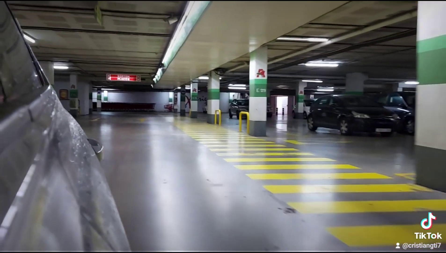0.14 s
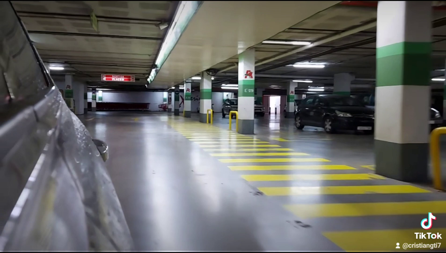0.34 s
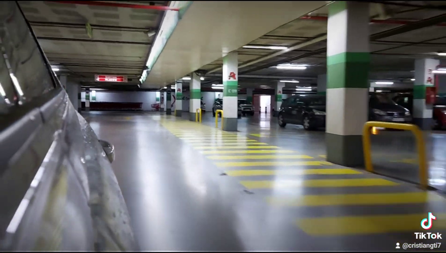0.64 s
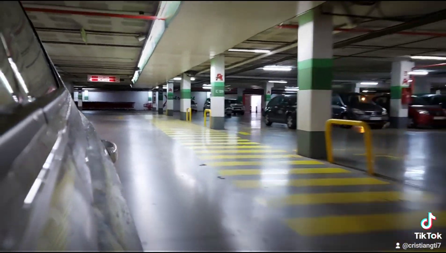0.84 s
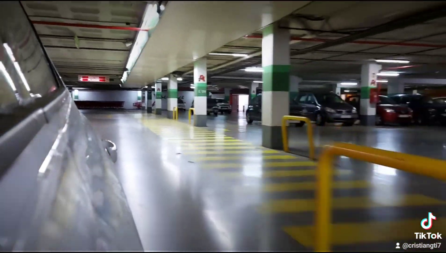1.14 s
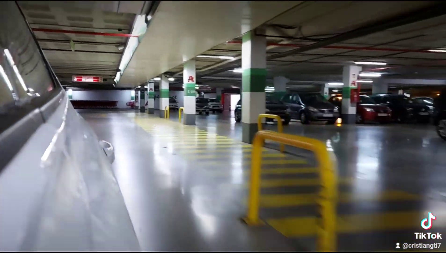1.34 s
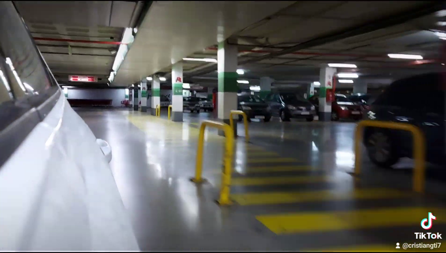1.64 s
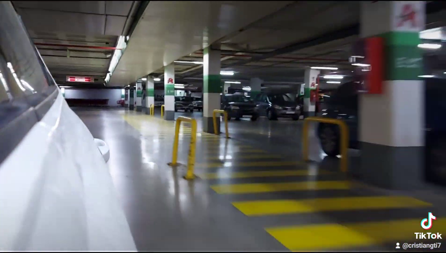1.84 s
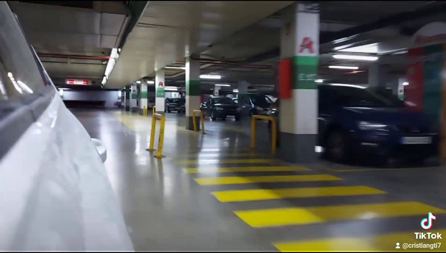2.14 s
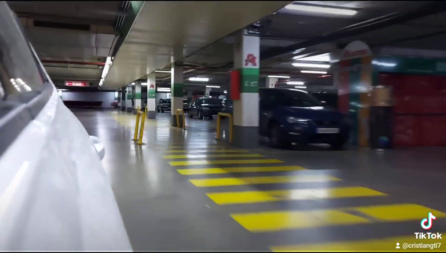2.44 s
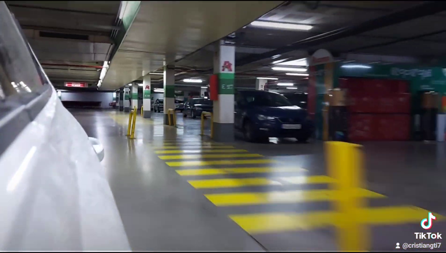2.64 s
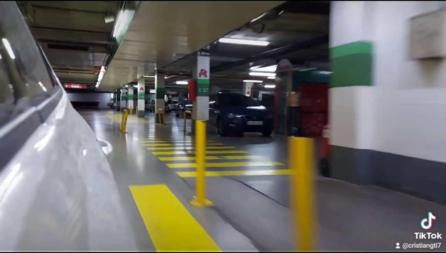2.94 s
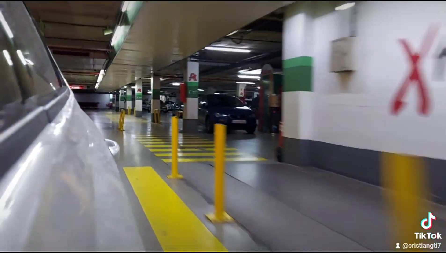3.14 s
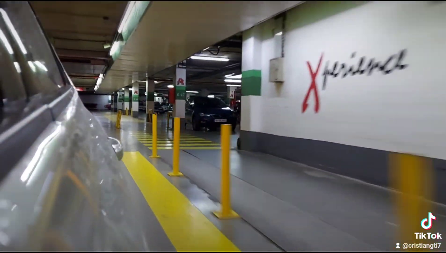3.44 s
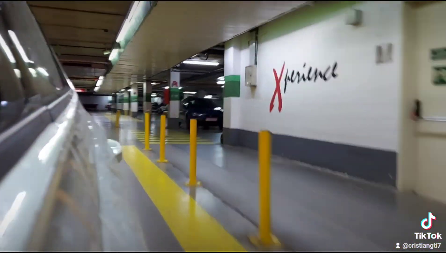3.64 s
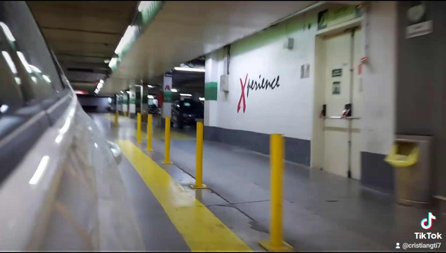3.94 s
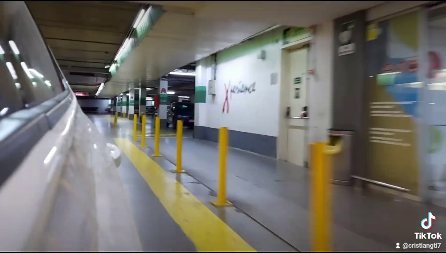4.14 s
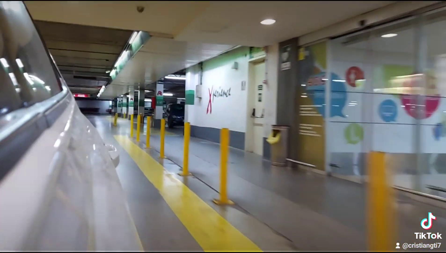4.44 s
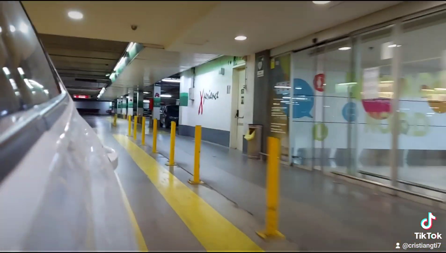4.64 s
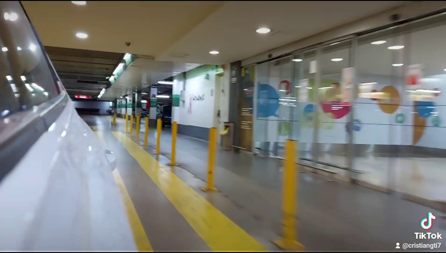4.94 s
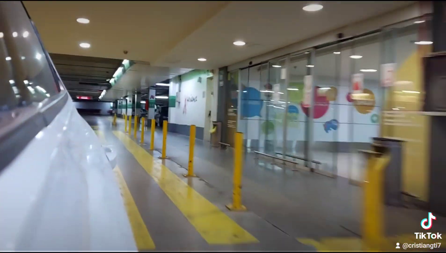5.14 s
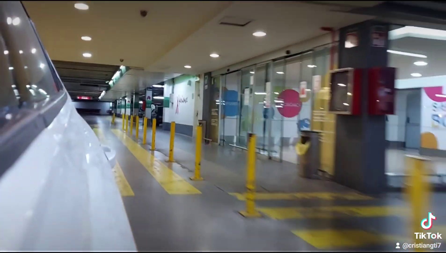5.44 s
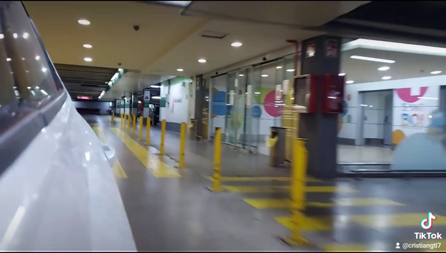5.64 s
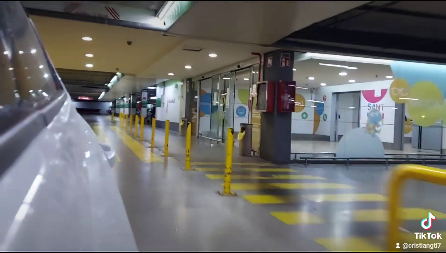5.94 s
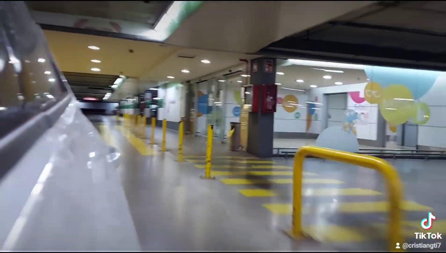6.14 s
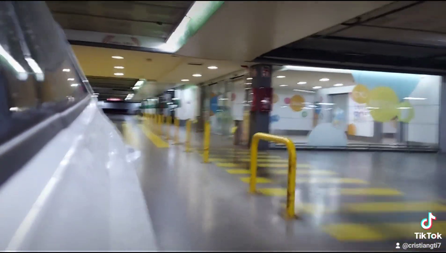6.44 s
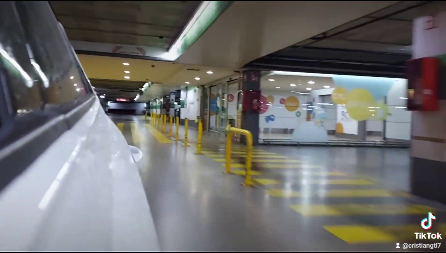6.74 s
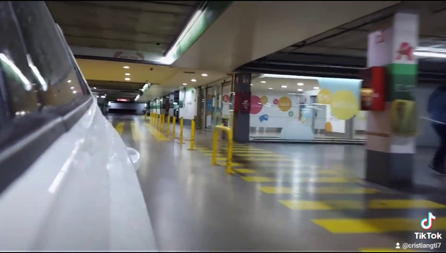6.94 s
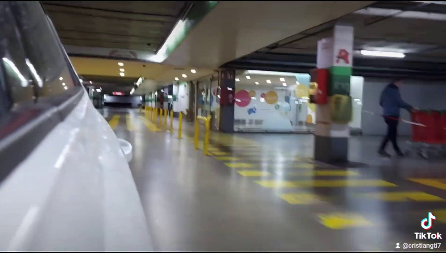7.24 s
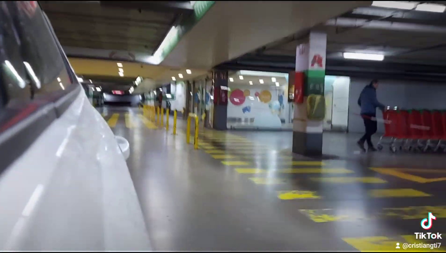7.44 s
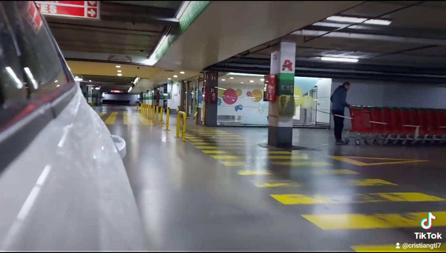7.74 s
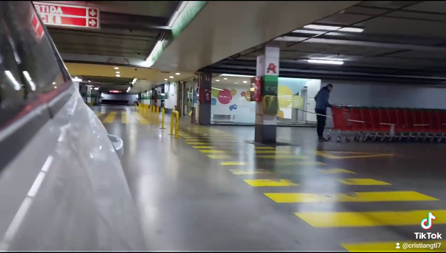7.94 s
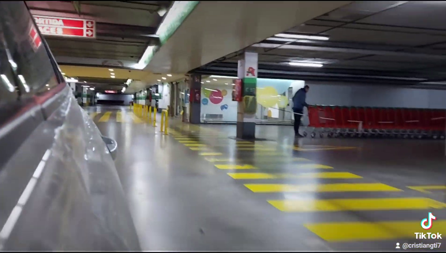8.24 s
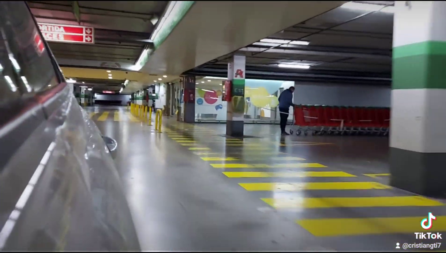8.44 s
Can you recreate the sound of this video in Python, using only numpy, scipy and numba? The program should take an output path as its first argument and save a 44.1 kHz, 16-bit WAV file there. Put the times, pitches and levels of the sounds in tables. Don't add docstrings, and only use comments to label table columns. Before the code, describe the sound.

Raspy car exhaust climbs, lifts off with a bark and sharp turbo hiss, burbles and pops, then blips again to one loud bang among concrete walls.

```python
import sys
import numpy as np
from scipy import signal
from scipy.fft import rfft, irfft
from scipy.io import wavfile
from scipy.ndimage import uniform_filter1d
from numba import njit

SR = 44100
rng = np.random.default_rng(int(sys.argv[2]) if len(sys.argv) > 2 else 0)


def magnitude_from_level(level_db):
    exponent = np.asarray(level_db, float) / 20
    return 10 ** exponent


def output_pcm(signal):
    pcm = np.clip(np.atleast_2d(signal).T, -1, 1) * 32767
    wavfile.write(sys.argv[1], SR, np.round(pcm).astype(np.int16))


N = 378378
T = np.arange(N) / SR

# time in seconds, firing rate in Hz.
FIRING_RATE = [(0.0, 41.82), (0.45, 48.97), (0.77, 56.5), (1.19, 64.67), (1.44, 74.68), (1.59, 78.07),
               (1.72, 86.2), (1.86, 98.14), (2.0, 117.8), (2.05, 114.9), (2.18, 95.45), (2.5, 81.77),
               (3.03, 63.6), (4.23, 57.88), (5.14, 52.75), (5.4, 68.49), (5.56, 72.97), (5.66, 82),
               (5.84, 81.36), (6.2, 82.38), (6.52, 84), (6.64, 78.13), (6.9, 74.5), (7.6, 65.53),
               (8.58, 59.12)]
# time in seconds, exhaust note in dB, load from 0 to 1.
THROTTLE = [(0.0, -19.5, 0), (0.55, -19.5, 0), (1.05, -16, 0.4), (1.4, -16, 0.8), (2.05, -13, 0.75),
            (2.22, -20.5, 0.81), (2.4, -36.5, 0.56), (2.84, -44, 0.75), (3.6, -33.5, 0.5), (4.3, -22, 0.19),
            (4.9, -20.5, 0.17), (5.15, -25.5, 0.25), (5.7, -19, 0.42), (5.8, -24, 0.63), (6.55, -16.5, 0.7),
            (7.2, -19.5, 0.42), (7.75, -21, 0.42), (8.58, -25.5, 0.1)]
# time in seconds, misfire scatter in dB,
# lope as the share of a period by which every second firing comes late.
BURN = [(0, .9, .014), (2.05, 1.1, .014), (2.3, 6, .03), (3.0, 6, .025), (4, 4.5, .02), (5, 4, .02),
        (5.36, 3.5, .02), (5.4, 1.8, .015), (5.57, 1.8, .015), (5.62, 4.5, .1), (5.72, 4, .1),
        (5.8, 4.5, .04), (6.12, 5, .045), (6.25, 6, .08), (6.66, 6, .08), (6.71, 2.5, .04),
        (6.88, 2.2, .015), (8, 2.5, .015), (8.1, 4, .015), (8.3, 1.5, .015), (8.58, 1.5, .015)]
CYLINDER_DB = [0.25, -0.24, -0.5, 0.37]
# middle in seconds, length in seconds, level in dB.
NOTE_DIPS = [(5.1, .05, -5), (2.8, .12, -5), (2.054, 0.08, -8), (5.17, .08, -8), (5.362, .06, -4),
             (2.858, 0.103, -7), (4.278, 0.13, -4.5), (5.023, 0.086, -7), (5.623, 0.066, -9),
             (6.305, 0.079, -3), (6.69, 0.049, -6), (7.014, 0.15, -5.5), (7.673, 0.13, -11.5),
             (8.223, 0.097, -18.5)]
# frequency in Hz, width in Hz.
PIPE_MODES = [(88, 45), (135, 58), (178, 40.7), (236, 32), (275, 64.5), (362, 65.4)]
MODE_DB = [-21.5, -18.5, -4.5, -20, -6, -5.5]
MODE_LOAD_DB = [16.5, 1.5, -5, 3, -2.5, -3.5]
# frequency in Hz, width in Hz, level in dB.
OVERTONES = [(449, 60, -11.5), (556.5, 52, -11), (680, 51, -17), (894.3, 80, -25)]
# frequency in Hz, width in Hz.
NOTCH = (204, 46)
# middle in seconds, length in seconds, mode in Hz, level in dB.
BAYS = [(0.08, 0.32, 178, 8), (0.63, 0.54, 178, 5.5), (0.039, 0.19, 275, 9.5), (0.94, .35, 135, -16),
        (1.689, 0.13, 88, 3.5), (2.13, 0.17, 88, 4.5), (0.43, 1, 236, -20), (0.33, 0.46, 135, 9),
        (1.563, 0.176, 178, 3.5), (6.86, 0.18, 88, 6), (6.45, 0.61, 362, 2), (7.4, 0.43, 275, -0.5),
        (5.77, 0.16, 88, 6.5), (6.22, 0.157, 88, -6), (6.27, 0.15, 178, -7), (6.42, 0.11, 178, 3),
        (6.19, 0.2, 236, 13), (7.1, 0.21, 236, 2), (6.85, 0.17, 135, 4), (6.92, 0.073, 275, 4),
        (6.5, 0.1154, 178, -1), (4.15, 0.29, 178, 4), (4.33, 0.13, 178, -5), (5.2, 0.1095, 178, -15),
        (4.876, 0.56, 178, 5.5), (4.6, 0.051, 362, 5), (5.2, 0.055, 362, 1), (1.025, 0.33, 178, 5),
        (1.209, 0.39, 275, 7), (1.335, 0.2, 135, 13.5), (1.47, 0.248, 362, 12), (1.475, 0.26, 275, -27),
        (1.75, 0.19, 362, -33), (1.97, 0.7, 178, 5.5), (1.982, 0.32, 236, 8), (0.43, 0.28, 362, 5),
        (6.4, 0.11, 88, 3), (4.874, 0.72, 178, -5), (4.86, 0.96, 275, -4.5), (4.77, 0.63, 362, -5.5),
        (6, 0.23, 362, 10), (5.71, 0.091, 362, 3), (5.97, 0.34, 362, -9.5), (5.1, 0.23, 236, 3.5),
        (5.9, 0.34, 275, -1.5), (8.0, 0.46, 236, 13), (8.1, 0.075, 88, 13.5), (8.504, 0.26, 178, 5),
        (7.83, 0.69, 178, -6), (5.9, 0.35, 88, 5)]
# middle in seconds, length in seconds, pitch in Hz, level in dB.
HOWLS = [(1.338, 0.15, 569, -26), (1.458, .1, 376.2, -14.5), (1.55, 0.067, 386, -17.5),
         (1.68, .14, 600, -26), (1.88, .3, 896, -32), (2.074, 0.09, 898, -25), (2.07, .08, 581, -24),
         (4.192, 0.056, 350.2, -21), (4.44, .12, 335, -25.5), (4.623, 0.059, 321, -22),
         (4.737, 0.059, 324, -21.5), (4.87, .14, 324, -25), (5.43, 0.081, 345, -19),
         (5.532, 0.093, 363, -17.5), (5.69, 0.082, 369.6, -16), (5.86, .12, 410, -26),
         (6.24, .07, 371, -16), (6.46, 0.087, 340.1, -18.5), (6.58, .12, 320, -20.5),
         (6.92, 0.073, 299, -21), (7.03, 0.11, 367, -23)]
# middle in seconds, length in seconds, level in dB, push 1 or suck -1.
BARKS = [
    (2.045, 0.094, -13, 1),
    (1.77, .3, -30, 1),
    (5.85, 0.21, -23, 1),
    (6.5, .32, -22, -1),
]
# time in seconds, left minus right in dB, left delay in ms.
SIDES = [(0, -4.5, 0.23), (2.0, -8, 0.11), (2.76, -12.5, 0.73), (2.86, -0.5, 0.55), (4.8, 2, 0.4),
         (5.3, 0, 0.42), (6.5, -3, 0.14), (8.58, -1, 0.088)]
# frequency in Hz, density in dB per Hz.
HALL_SPECTRUM = [(18, -44), (30, -2), (75, 4), (206, -6.5), (285, 7.5), (486, 0), (994, -15.5),
                 (1500, -15.5), (4000, -81), (5200, -78), (8800, -120)]
# time in seconds, air flow in dB.
AIR_FLOW = [(0.0, -46.5), (1.22, -45.5), (1.6, -40), (1.68, -36), (1.98, -33), (2.06, -33), (2.2, -27.5),
            (2.6, -46.5), (2.87, -60), (3.5, -57), (4.44, -48), (5.35, -52), (5.45, -44), (5.8, -48.5),
            (6.02, -49.5), (6.21, -52), (6.52, -50), (7.53, -50), (8.58, -53.5)]
# middle in seconds, half length in seconds, level in dB.
CHUFFS = [
    (2.95, .035, 9),
    (5.97, 0.062, 3.5),
    (1.4, .03, 3),
    (1.68, 0.025, 2.5),
]
# frequency in Hz, density in dB per Hz.
RASP_SPECTRUM = [(290, -18), (500, 6), (567, -1), (624, 3), (909, -1.5), (981, -4.5), (1250, -15.5),
                 (1560, -7), (1950, -13), (3270, -17), (5000, -51), (6500, -63), (11000, -120)]
# frequency in Hz, density in dB per Hz.
RUSH_SPECTRUM = [(1180, 1.5), (2000, -3), (3270, -8), (4190, -8), (4680, -10.5), (6740, -13.5),
                 (8050, -15.5), (9460, -20.5), (11900, -19.5), (15200, -27)]
# middle in seconds, length in seconds, level in dB.
GUSTS = [(0.01, 0.109, -32), (0.706, 0.98, -26), (1.699, 0.79, -20.5), (2.513, 0.54, -23),
         (3.965, 0.84, -35.5), (4.34, 0.24, -34), (5.288, .12, -29), (3.1, 0.45, -38.5), (4.662, .2, -31.5),
         (4.87, .18, -29), (5.918, 0.43, -29), (6.31, 0.18, -32.5), (6.608, 0.156, -34), (8.12, 0.2, -34),
         (8.58, 0.14, -35)]
# start in seconds, end in seconds, pitch in Hz, width in Hz, level in dB.
WHINE = [
    (1.5, 2.12, 3900, 750, -40),
    (3.7, 5.3, 5450, 600, -63),
    (1.35, 2.08, 1550, 280, -36),
    (6.85, 8.1, 1420, 230, -50),
    (0, 1.1, 1500, 500, -51),
    (.1, .9, 2900, 900, -55),
    (5.36, 5.82, 1500, 800, -46),
    (7.15, 8.3, 3330, 280, -55),
    (6.85, 7.35, 2950, 300, -54),
]
# frequency in Hz, density in dB per Hz.
DUMP_SPECTRUM = [(290, -28.5), (500, -21), (740, -10), (911, -4.5), (1210, -9.5), (1590, -8), (2180, -15),
                 (8000, -27), (13000, -34), (15200, -57)]
# start in seconds, peak in dB, crack in dB relative to the thump.
POPS = [(3.766, -27, -22.5), (2.447, -17.5, -3.5), (2.49, -16.5, -4.5), (2.539, -18, -6.5), (2.618, -26, 1),
        (2.64, -13.5, -8), (2.668, -15, -20.5), (2.739, -13, -15), (3.132, -16, -10.5), (3.088, -60, -22),
        (3.412, -18.5, -43), (3.561, -21.5, -33), (3.631, -19.5, -32), (4.153, -16, -15), (4.227, -17, -13),
        (4.389, -11, -32), (4.61, -14, -15), (4.785, -19, -33), (5.204, -12.5, -31), (5.228, -13, -24),
        (5.327, -12, -22), (5.287, -14.5, -29), (5.576, -10, -30), (5.635, -13.5, -20), (5.704, -10, -23.5),
        (6.107, -18, -31), (6.214, -7.5, -35), (6.546, -7.5, -36.5), (6.699, -2.5, -21), (6.707, -3, -14),
        (6.758, -26, -4), (8.068, -15, -35)]
# start in seconds, peak in dB.
SPITS = [(2.833, -29), (2.949, -30), (3.087, -29), (3.278, -31), (3.312, -30), (3.36, -36), (3.407, -29),
         (3.516, -40), (3.547, -34), (3.633, -31), (3.687, -31), (3.767, -30), (3.974, -28), (4.068, -27),
         (4.151, -29), (4.228, -30), (4.269, -25.5), (4.386, -27), (4.438, -28), (4.516, -30), (4.54, -28),
         (4.747, -30), (4.789, -27), (5.05, -29), (5.175, -24.5), (5.206, -30.5), (5.28, -30),
         (5.496, -24.5), (5.613, -31), (5.633, -27), (5.704, -21), (6.005, -28.5), (6.107, -34.5),
         (6.215, -31), (6.343, -34), (6.397, -28), (6.707, -17.5), (6.948, -29), (7.228, -25), (7.265, -28),
         (7.431, -32), (7.491, -35), (7.703, -30), (8.24, -36)]
# level in dB, fade in seconds, centre in Hz, width in Hz, knocks per second.
RATTLE = (-22, 0.11, 480, 697, 500)
# time in seconds, pitch in Hz, level in dB.
SQUEAK = [
    (7.27, 11530, -72),
    (7.34, 11540, -64),
    (7.39, 11550, -57),
    (7.45, 11560, -59),
    (7.5, 11570, -63),
    (7.56, 11580, -72),
]
# low edge in Hz, high edge in Hz, margin in dB.
GATE = [(5000, 8300, -3.3), (8300, 10800, -.7), (10800, 13300, -2.2), (13300, 15500, -.9)]


def level(x, db):
    return x * magnitude_from_level(db) / np.sqrt(np.mean(x ** 2))


def even(x):
    power = uniform_filter1d(uniform_filter1d(x ** 2, 6000), 6000)
    return x / np.sqrt(power + 1e-12)


def read(table):
    s, *columns = np.transpose(table)
    return [np.interp(T, s, column) for column in columns]


def bump(s, length):
    return np.exp(-(2 * (T - s) / length) ** 4)


def pan(x, db):
    db = np.atleast_1d(db)
    return x * magnitude_from_level(np.array([db, -db]) / 2)


def delay_left(left, right, late_ms):
    return np.array([np.interp(T - late_ms / 1000, T, left), right])


def walk(rate):
    hold = int(SR / rate)
    steps = np.repeat(rng.standard_normal(N // hold + 1), hold)
    return 1.3 * uniform_filter1d(uniform_filter1d(steps, hold), hold)[:N]


@njit
def svf(x, hz, width):
    y, b, l = np.empty(len(x)), 0., 0.
    g, k = np.tan(np.pi * hz / SR), width / hz
    for i in range(len(x)):
        v = (b + g * (x[i] - l)) / (1 + g * (g + k))
        b, l, y[i] = 2 * v - b, l + 2 * g * v, k * v
    return y


def ring(x, hz, width):
    hz, width = 1. * hz, 1. * width
    return svf(svf(x, hz, width), hz, width)


def band(x, lo_hz, hi_hz):
    return signal.sosfilt(signal.butter(N=2, Wn=[lo_hz, hi_hz], btype="band", fs=SR, output="sos"), x)


def rush(spectrum, flicker_db, rate, alike_hz):
    hz, db = np.transpose(spectrum)
    f = np.fft.rfftfreq(N, 1 / SR)
    gain = magnitude_from_level(np.interp(np.log(f + 1), np.log(np.maximum(hz, 1)), db, -120, -120))
    alike = 1 / (1 + (f / alike_hz) ** 2)
    mid, side = rfft(rng.standard_normal((2, N))) * gain * np.sqrt([1 + alike, 1 - alike])
    ports = np.array([mid + side, mid - side])
    half_octave = 2 * np.log2(f[gain > 1e-5])
    place = 2 * np.log2(f + 1)
    out = 0
    for part in np.array_split(np.unique(np.round(half_octave)), 5):
        inside = (place > part[0] - .5) & (place <= part[-1] + .5)
        out = out + magnitude_from_level(flicker_db * walk(rate)) * irfft(ports * inside, N)
    return level(out, 0)


@njit
def fire(hz, scatter_db, lope, chance, pattern_db):
    pulses, p, k = np.zeros(len(hz) + 1), .99, 0
    for i in range(len(hz)):
        late = lope[i] * (2 * (k % 2) - 1) + .004 * scatter_db[i] * (chance[1, k + 1] - chance[1, k])
        step = hz[i] / SR / (1 + late)
        p += step
        if p >= 1:
            p, k = p - 1, k + 1
            size = 10 ** ((pattern_db[k % 4] + scatter_db[i] * chance[0, k]) / 20)
            pulses[i] += size * p / step
            pulses[i + 1] += size * (1 - p / step)
    return pulses[:-1]


def howl(pulses):
    out = sum(magnitude_from_level(db) * bump(s, length) * even(ring(pulses, hz, 40)) for s, length, hz, db in HOWLS)
    bark = even(band(ring(pulses, 325, 430), 60, 1300))
    return out + bark * sum(way * magnitude_from_level(db) * bump(s, length) for s, length, db, way in BARKS)


def exhaust():
    note_db, load = read(THROTTLE)
    scatter_db, lope = read(BURN)
    pan_db, late_ms = read(SIDES)
    waver = 1 + .0028 * (scatter_db - 1) * walk(16)
    chance = np.clip(rng.standard_normal((2, N // 100)), -2, 2)
    pulses = fire(read(FIRING_RATE)[0] * waver, scatter_db, lope, chance, np.array(CYLINDER_DB) * 1.)
    gas = pulses - svf(pulses, 1. * NOTCH[0], 1. * NOTCH[1])

    mode_db = [db * load + 1.5 * walk(14) for db in MODE_LOAD_DB]
    for s, length, hz, db in BAYS:
        k = np.argmin([abs(np.log(hz / f)) for f, _ in PIPE_MODES])
        mode_db[k] = mode_db[k] + db * bump(s, length)
    note, high = 0, 0
    for k, (hz, width) in enumerate(PIPE_MODES):
        note = note + (-1) ** k * magnitude_from_level(mode_db[k]) * level(ring(gas, hz, width), MODE_DB[k])
    for k, (hz, width, db) in enumerate(OVERTONES):
        high = high + (-1) ** k * magnitude_from_level(db) * even(ring(gas, hz, width))
    high = high * magnitude_from_level(-16 + 9 * load + 1.75 * scatter_db)

    dip_note_db = sum(db * bump(s, length) for s, length, db in NOTE_DIPS)
    pipe = magnitude_from_level(note_db + dip_note_db) * (note + high) + howl(pulses)
    return delay_left(pipe, pipe, late_ms) * pan(1, pan_db), pulses


@njit
def walls(x, lags, gain, damp):
    line, soft, out = np.zeros((8, 4096)), np.zeros(8), np.zeros((2, len(x)))
    for i in range(len(x)):
        total = 0.
        for k in range(8):
            soft[k] += (1 - damp) * (gain[k] * line[k, (i - lags[k]) & 4095] - soft[k])
            total += soft[k]
            out[k % 2, i] += soft[k]
        for k in range(8):
            line[k, i & 4095] = x[i] + soft[k] - total / 4
    return out


def echo(note, bangs):
    t60_s, damp, note_send_db, bang_send_db = 1.5, .45, -16.5, -18
    lags = rng.integers(900, 3600, 8)
    send = magnitude_from_level(note_send_db) * note + magnitude_from_level(bang_send_db) * bangs
    return walls(send.mean(axis=0) + 1e-18, lags, magnitude_from_level(-60 * lags / SR / t60_s), damp)


def hum():
    pan_db, late_ms = read(SIDES)
    swell_db = 0.23 * (uniform_filter1d(read(THROTTLE)[0], SR // 4) + 24)
    left, right = magnitude_from_level(-27 + swell_db) * rush(HALL_SPECTRUM, 3.1, 16, 300.0)
    return delay_left(left, right, late_ms) * pan(1, 0.84 * pan_db)


def airflow(pulses):
    flow_db = read(AIR_FLOW)[0] + sum(db * np.exp(-((T - s) / half) ** 2) for s, half, db in CHUFFS)
    rasp_db = -33.5 + 0.87 * (flow_db + 49) + 0.071 * (read(THROTTLE)[0] + 22)
    puff_s = .008
    puffs = signal.lfilter([1], [1, -np.exp(-1 / (puff_s * SR))], uniform_filter1d(pulses, 90))
    rasp = level((.7 + even(puffs)) * rush(RASP_SPECTRUM, 2.0, 10, 700.), -1.5)
    hiss = rush(RUSH_SPECTRUM, 0.99, 13, 300.0) * magnitude_from_level(flow_db + 4.5)
    return pan(rasp * magnitude_from_level(rasp_db) + hiss, -1.5 + 0.29 * read(SIDES)[0])


def wind():
    gusts = [magnitude_from_level(2.5 * walk(14)) * ring(rng.standard_normal(N), 70, 110) for _ in range(2)]
    breeze_db = -40
    blow = magnitude_from_level(breeze_db) + sum(magnitude_from_level(db) * bump(s, length) for s, length, db in GUSTS)
    return blow * np.array([level(gusts[0], 1.5), level(gusts[1], 5)])


def turbo():
    open_s, rise_s, jet_db = 2.07, 0.0073, -19.5
    low_hold_s, low_fade_s, top_hold_s, top_fade_s = 0.0954, 0.24, 0.18, 0.043
    t = T - open_s
    jet = magnitude_from_level(jet_db) * np.clip(t / rise_s, 0, 1) * rush(DUMP_SPECTRUM, 0.9, 13.0, 560.0)
    low = band(jet, 300, 4500) * np.exp(-np.maximum(t - low_hold_s, 0) / low_fade_s)
    top = band(jet, 4500, 16000) * np.exp(-np.maximum(t - top_hold_s, 0) / top_fade_s)
    out = pan(low + top, -4.)
    for t0, t1, hz, width, db in WHINE:
        swell = np.sin(np.pi * np.clip((T - t0) / (t1 - t0), 0, 1)) ** .5 * magnitude_from_level(2.5 * walk(7))
        pitch = np.interp(T, [t0, t1], [1.02 * hz, .98 * hz]) + 60 * walk(4)
        glide = np.exp(2j * np.pi * np.cumsum(pitch) / SR)
        span = int(.75 * SR / width)
        breath = uniform_filter1d(uniform_filter1d(rng.standard_normal((4, N)), span), span)
        out = out + swell * level(np.real(glide * (breath[:2] + 1j * breath[2:])), db)
    return out


def pops():
    out, pan_db = np.zeros((2, N)), read(SIDES)[0]
    t = np.arange(int(.2 * SR)) / SR
    late = np.maximum(t - .003, 0)
    push = late * np.exp(-late / 0.00036)
    thump = svf(push, 351.0, 120.0) - 0.76 * svf(push, 182.0, 160.0)
    thump = thump + 0.49 * svf(push, 86.0, 96.0) + 0.84 * svf(push, 545.0, 440.0)
    fade = (np.exp(-t / 0.0074) + .5 * np.exp(-t / 0.082)) * np.minimum(t / 0.0059, 1)
    for s, db, crack_db in POPS:
        crack = band(svf(rng.standard_normal(len(t)), 840.0, 1000.0), 250, 2120) * fade
        pop = magnitude_from_level(db - 1.0) * (thump / abs(thump).max() + magnitude_from_level(crack_db) * crack / abs(crack).max())
        i = int(s * SR)
        out[:, i:i + len(t)] += pan(pop, 1.1 * pan_db[i:i + 1])[:, :N - i]
    return out


def sputter():
    s, db = np.transpose(SPITS)
    kicks = np.zeros(N)
    kicks[(s * SR).astype(int)] = magnitude_from_level(db - 3)
    spit_ring_s = .008
    fade = signal.lfilter([1], [1, -np.exp(-1 / (spit_ring_s * SR))], kicks)
    spit = band(fade * level(svf(rng.standard_normal(N), 660.0, 700.0), 0), 350, 1550)

    db, fade_s, hz, width, rate = RATTLE
    rattle_s = 6.712
    t = np.maximum(T - rattle_s, 0)
    knocks = (rng.random(N) < rate / SR) * rng.standard_normal(N) + 0.041 * rng.standard_normal(N)
    rattle = level(band(ring(knocks, hz, width), 200, 2260), db)
    rattle = rattle * np.minimum(t / .004, 1) * np.exp(-t / fade_s)
    return pan(spit + rattle, read(SIDES)[0])


def brake():
    hz, db = read(SQUEAK)
    on = uniform_filter1d(1. * (T > SQUEAK[0][0]) * (T < SQUEAK[-1][0]), 3000)
    tone = np.sin(2 * np.pi * np.cumsum(hz + 40 * walk(90)) / SR) * magnitude_from_level(db + 2.5 * walk(60))
    return pan(on * tone, -1.5)


def scene():
    note, pulses = exhaust()
    bangs = pops() + sputter()
    out = note + bangs + echo(note, bangs)
    return out + hum() + airflow(pulses) + wind() + turbo() + brake()


def gate(x):
    f, _, z = signal.stft(x, SR, nperseg=2048)
    power = (abs(z[:, :1024]) ** 2).sum(axis=0).reshape(128, 8, -1).mean(axis=1)
    band_db = 10 * np.log10(power + 1e-20)
    band_db[88:] = band_db[84]
    dip_db = band_db - uniform_filter1d(band_db, 11, axis=0)
    low_hz = f[:1024:8]
    margin_db = sum(db * (low_hz >= lo) * (low_hz < hi) for lo, hi, db in GATE)
    mute = (dip_db < margin_db[:, None]) & (margin_db[:, None] < 0)
    z[:, :1024] *= np.repeat(1 - mute, 8, axis=0)
    return signal.istft(z, SR, nperseg=2048)[1][:, :N]


def top_cut(x):
    return signal.sosfilt(signal.butter(12, 15500, fs=SR, output="sos"), x)


def record(dry):
    thin = signal.sosfilt(signal.butter(2, 52, "high", fs=SR, output="sos"), dry)
    hiss = level(band(rng.standard_normal(dry.shape), 10500, 13000), -69)
    rounded = np.tanh(.85 * (thin + hiss)) / .85
    return top_cut(gate(rounded))


dry = scene()
out = record(dry)
output_pcm(out)
```